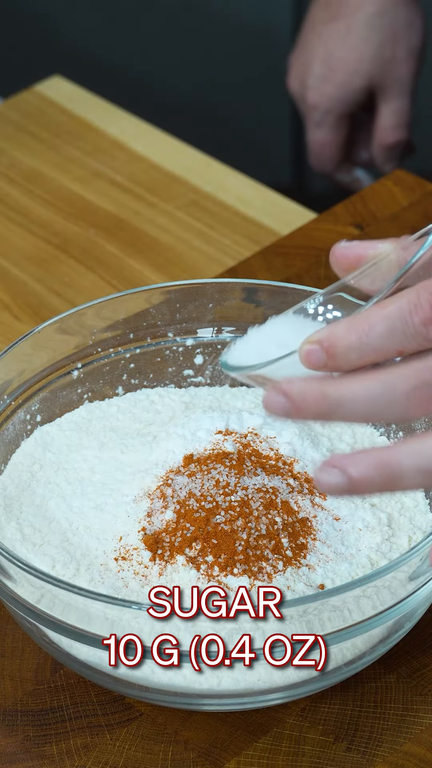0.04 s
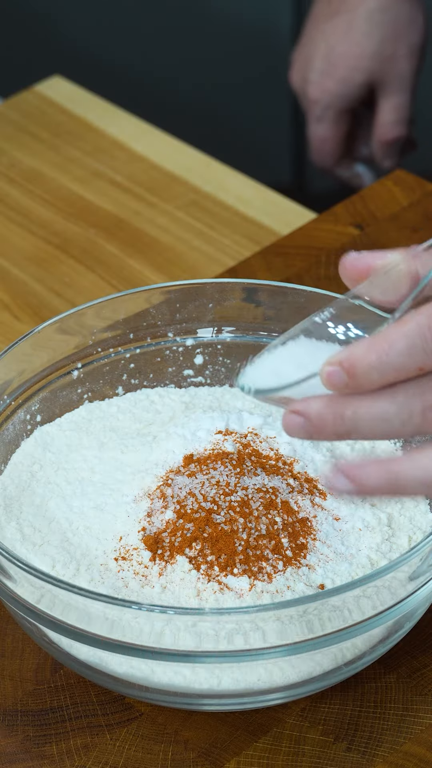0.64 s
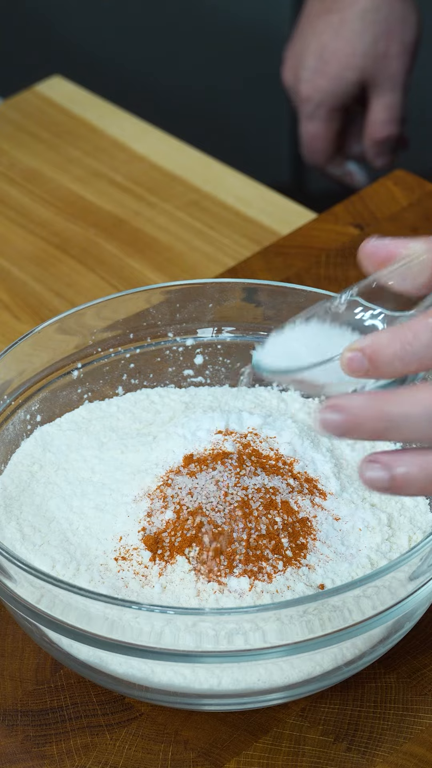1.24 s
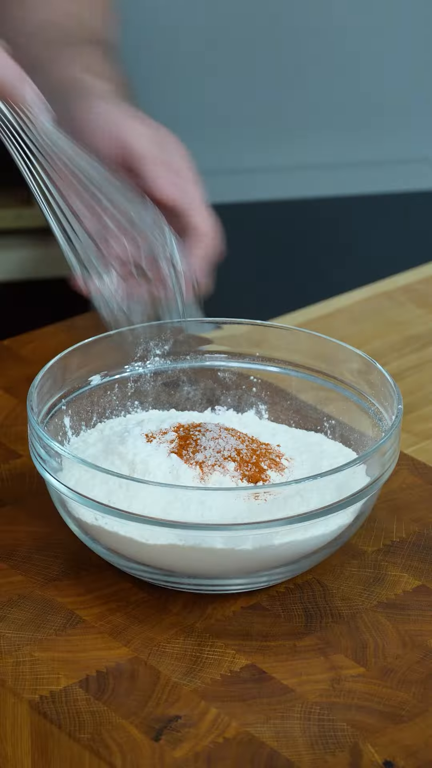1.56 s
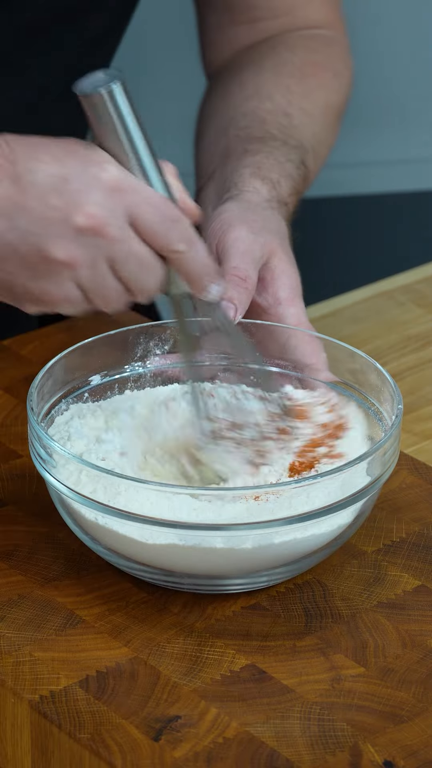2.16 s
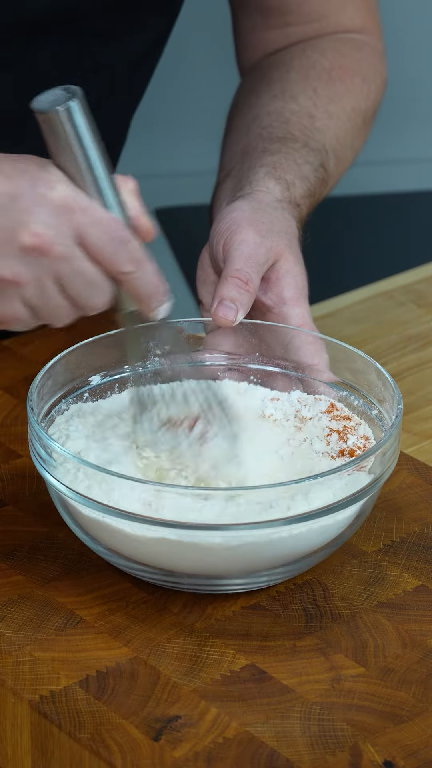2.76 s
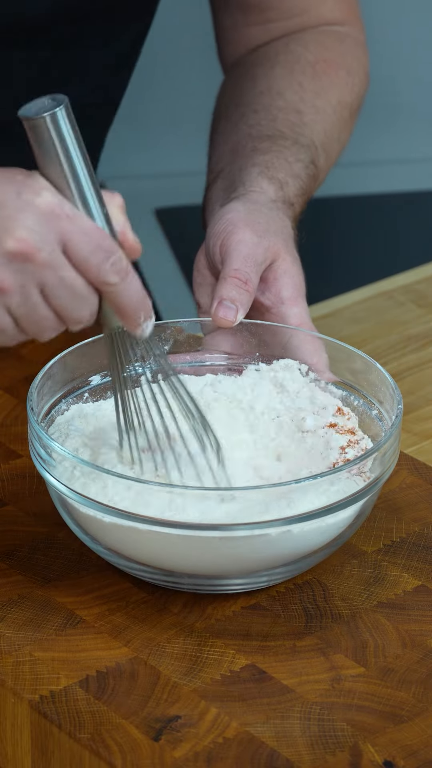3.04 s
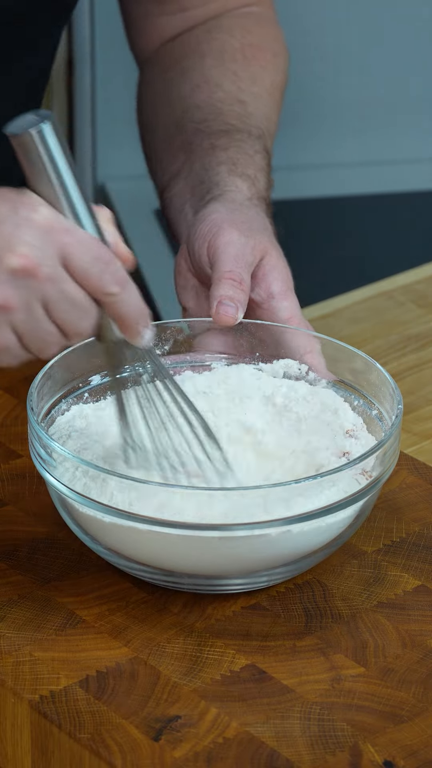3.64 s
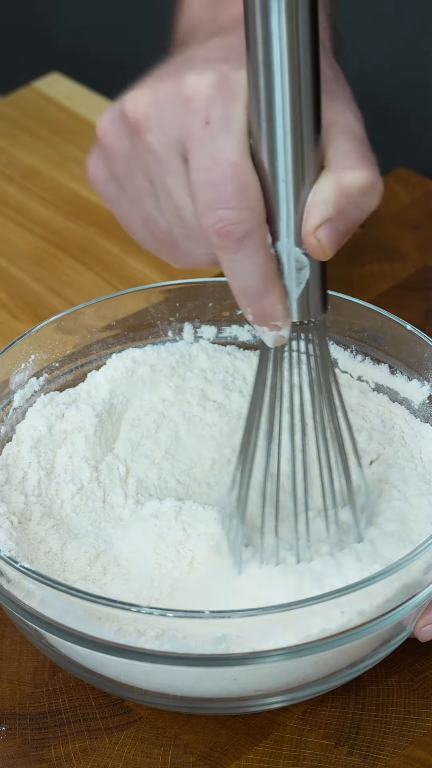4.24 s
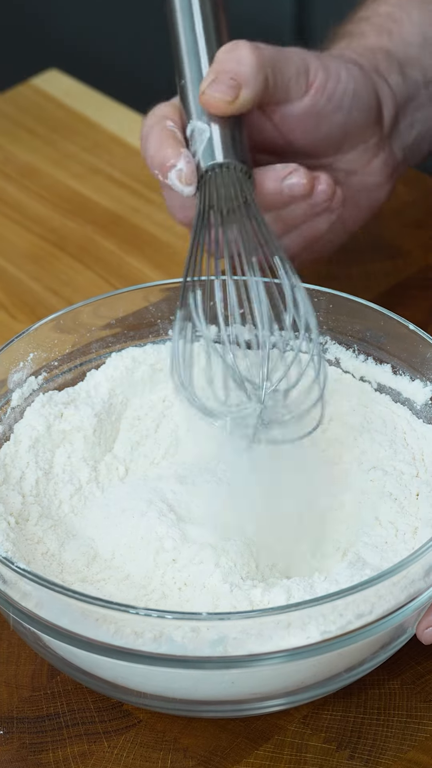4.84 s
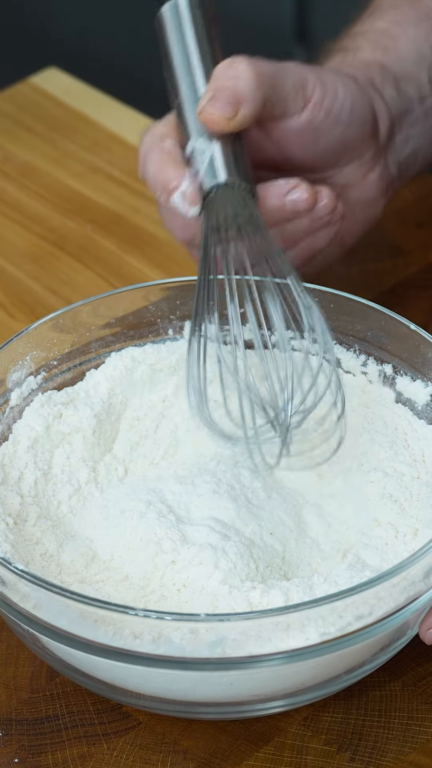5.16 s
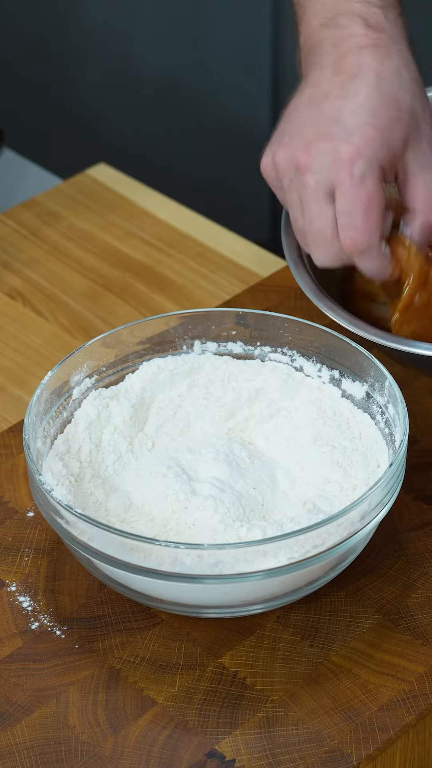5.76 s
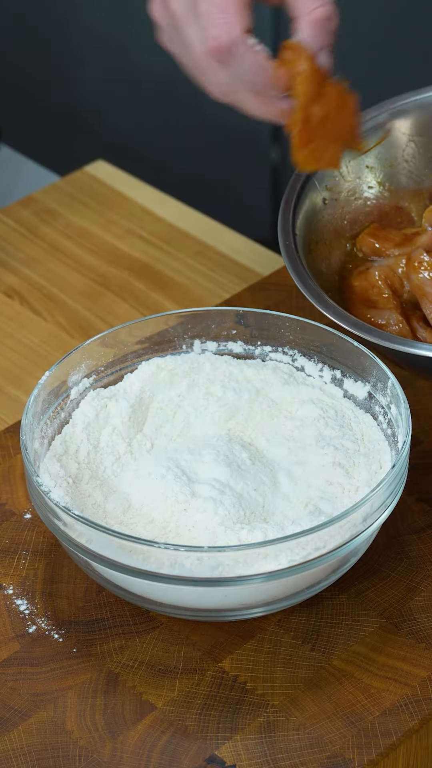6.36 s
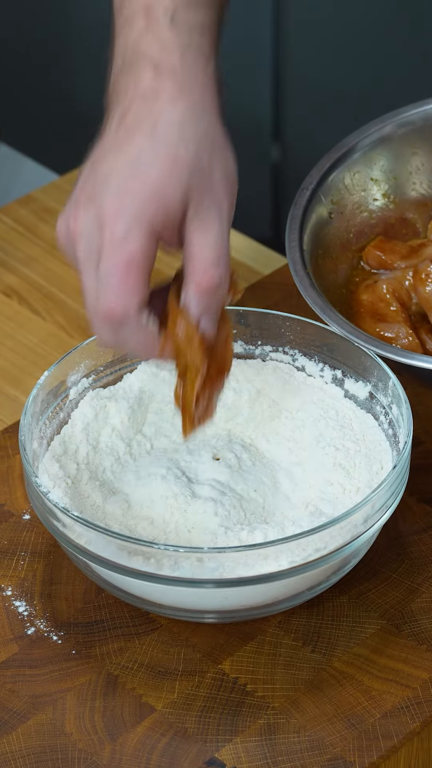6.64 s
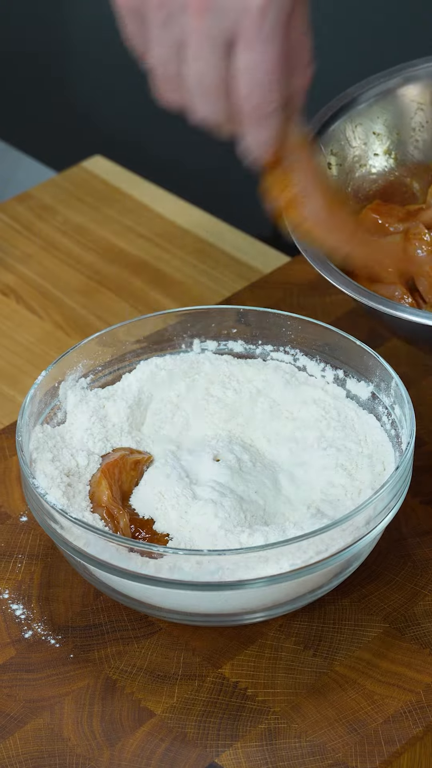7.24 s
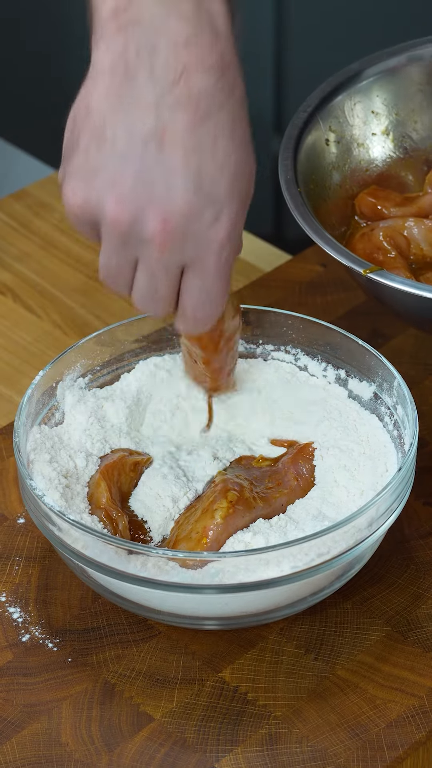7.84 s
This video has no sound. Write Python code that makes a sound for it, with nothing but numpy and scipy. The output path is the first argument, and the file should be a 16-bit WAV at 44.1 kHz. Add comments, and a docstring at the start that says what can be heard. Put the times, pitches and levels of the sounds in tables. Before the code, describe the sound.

A faint appliance hum fills a small, slightly reverberant kitchen throughout. From about 0.6 to 1.2 seconds, four very faint taps sound on a little glass dish. At 1.6 seconds sugar slides into a bowl of flour with a soft hiss that fades by 2.2. A wire whisk then rustles almost inaudibly through the flour until about 4.1 seconds, with tiny scrapes. Around 4.3 seconds the glass bowl bumps lightly on its wooden board. Between 4.8 and 5.4 seconds comes the loudest part, close by: the whisk is rapped four times quickly on the rim, each rap a bright, short glassy ring with jangling wires, while the rocking bowl knocks hollowly on the wood. The wires rattle once more around 5.6 seconds and the ringing stops. From 5.7 seconds to the end near 8, very faint wet touches and a small squelch follow as meat strips are laid in the flour.

```python
"""Sugar, flour and a whisk on glass

Sugar slides from a tapped glass dish into a glass bowl of flour, its countless impacts merging into a hiss.
A wire whisk stirs almost silently, then is rapped four times on the rim: the glass rings in its natural
modes, the wires jangle and the bowl knocks on its wooden board. Strips of wet meat are then laid in.
A small reverberant kitchen with a humming appliance surrounds it all."""
import sys
import numpy as np
from scipy import signal
from scipy.fft import rfft, irfft
from scipy.io import wavfile

SR = 44100
rng = np.random.default_rng(int(sys.argv[2]) if len(sys.argv) > 2 else 0)


def generate_wav(signal):
    """Clip the signal to [-1, 1] and save it as 16-bit WAV at the path in sys.argv[1]."""
    frames = np.transpose(np.atleast_2d(signal))
    scaled = np.clip(frames, -1, 1) * 32767
    pcm = np.round(scaled).astype(np.int16)
    wavfile.write(sys.argv[1], SR, pcm)


N = 352611
TIME = np.arange(N) / SR
AGE = TIME[:SR]   # the second that follows a blow
WIRE_SWING_S = .023   # the wire loops swing to and fro, so their contacts repeat at this period


def from_db(db):
    """Amplitude ratio of a level in decibels."""
    return 10 ** (np.asarray(db) / 20)


def rms_one(x):
    """Normalisation to unit rms."""
    return x / np.sqrt(np.mean(x ** 2) + 1e-20)


def at_hz(points, hz):
    """Interpolation of a spectrum on a logarithmic frequency axis."""
    frequencies, values = np.transpose(points)
    return np.interp(np.log(hz + 1e-9), np.log(frequencies), values)


def noise(gain_at, size):
    """Spectral shaping: white noise weighted by frequency, at unit rms."""
    hz = np.arange(size // 2 + 1) * SR / size + 1e-9
    return rms_one(irfft(rfft(rng.standard_normal(size)) * gain_at(hz), size))


def band_noise(centre_hz, octaves, size=SR):
    """Noise in a Gaussian band on a logarithmic frequency axis."""
    return noise(lambda hz: np.exp(-.5 * (np.log2(hz / centre_hz) / octaves) ** 2), size)


def drift(rate_hz, size=N):
    """Random fluctuation: low-pass noise at unit rms."""
    return noise(lambda hz: 1 / (1 + (hz / rate_hz) ** 2), size)


def cut(x, hz, kind, order=2):
    """Butterworth filter."""
    return signal.sosfilt(signal.butter(order, hz, kind, fs=SR, output="sos"), x)


def fade(t60):
    """Exponential decay: 60 dB in t60 seconds."""
    return 1000. ** (-AGE / t60)


def swell(rise_s, t60):
    """Linear attack, then exponential decay."""
    return np.minimum(AGE / rise_s, 1) * from_db(-60 * np.maximum(AGE - rise_s, 0) / t60)


def add(track, s, sound):
    """Superposition of a sound on the track at time s."""
    at = int(round(s * SR))
    track[at:at + len(sound)] += sound[:N - at]


def strike(modes, scatter_db, detune_hz, flutter=0):
    """Free vibration: damped modes vary with the contact point; a changing load flutters their pitch."""
    chance = rng.standard_normal((len(modes), 3))
    clock = AGE + flutter * np.cumsum(drift(rate_hz=45, size=SR)) / SR
    out = np.zeros(SR)
    for (hz, db, t60), (strength, shift, polarity) in zip(modes, chance):
        amplitude = from_db(db + scatter_db * strength) * np.sign(polarity)
        out += amplitude * fade(t60) * np.sin(2 * np.pi * (hz + detune_hz * shift) * clock)
    return out


def chatter(sound, per_s, t60, size):
    """Contact bounce: convolution with one impulse and its randomly timed, dying rebounds."""
    rebounds = (rng.random(SR) < per_s / SR) * rng.standard_normal(SR) * size * fade(t60)
    return signal.fftconvolve(sound, rebounds + signal.unit_impulse(SR))[:SR]


# early reflections from worktop and cupboards: (delay [s], gain [ratio])
REFLECTIONS = [(.0033, 0.38), (.0046, .45), (.0058, 0.38), (0.0114, .14), (.030, .16), (.042, 0.12)]
# diffuse tail of the kitchen: (frequency [Hz], t60 [s], relative level [dB])
REVERB_BANDS = [(100, 0.57, 7), (430, 0.44, -8), (900, 0.37, -1.5), (2500, 0.4, -1), (5960, .5, -7.5),
                (10000, 0.57, -9.5), (16000, .28, -19.5)]

def kitchen(x, tail_db):
    """Reverberation: direct sound, early reflections, then a diffuse tail that decays band by band."""
    hz = np.arange(SR // 2 + 1)
    white = rfft(rng.standard_normal(SR))
    response = np.zeros(SR)
    for centre, t60, db in REVERB_BANDS:
        share = at_hz([(row[0], row[0] == centre) for row in REVERB_BANDS], hz)
        decay = fade(t60) * np.clip((AGE - .004) / .012, 0, 1)
        response += from_db(db + tail_db) * irfft(white * share, SR) * decay / np.linalg.norm(decay)
    response[0] += 1
    for delay, gain in REFLECTIONS:
        add(response, delay, gain * cut(signal.unit_impulse(64), 3700, "low", order=1))
    return signal.fftconvolve(x, response)[:N]


# room air before its bass roll-off: (frequency [Hz], relative spectral density [dB])
AIR_SPECTRUM = [(15, -37.5), (25, -7), (55, 3), (74, -9.5), (108, -3), (127, -16), (161, -8.5),
                (249, -16.5), (285, -10), (451, -19), (734, -22), (911, -20), (1260, -28.5), (5430, -44.5),
                (16000, -54)]
# appliance hum: (frequency [Hz], rms level [dB], width [Hz])
HUM_TONES = [(49.7, -66, 0.54), (98, -72.5, 1.3), (164.6, -81.5, 30), (274, -81.5, 20), (452.4, -79, 4.7),
             (794, -85.5, 11), (890, -79, 8), (1110, -86.5, 140), (5420, -96.5, 250)]

def background(air_db=-68.77, roll_off_hz=130):
    """Ambient noise: broadband air plus appliance tones broadened by random frequency modulation."""
    air = noise(lambda hz: from_db(at_hz(AIR_SPECTRUM, hz)) * hz / np.hypot(hz, roll_off_hz), N)
    out = from_db(air_db) * air
    for hz, db, width in HUM_TONES:
        pitch_hz = hz + width / 2 * drift(width)
        out += from_db(db) * rms_one(np.sin(2 * np.pi * np.cumsum(pitch_hz) / SR))
    return out


# resonances of the wires in flour: (frequency [Hz], half width [Hz], relative level [dB])
RUSTLE_PEAKS = [(5370, 570, -4.5), (6450, 160, -7), (8600, 270, 0), (11900, 220, -20)]
# wires catching on the bowl under the flour: (time [s], level [dB])
WIRE_CATCHES = [(2.53, -87), (2.67, -89), (3.762, -75), (3.935, -88), (4.109, -82.5)]

def stirring(start_s=2.3, end_s=4.08, ramp_s=.25, level_db=-91.5, strokes_per_s=8):
    """Frictional excitation: uneven strokes in flour keep the wires singing; some catch on the bowl."""
    moving = np.clip(np.minimum(TIME - start_s, end_s - TIME) / ramp_s, 0, 1)
    singing = noise(lambda hz: sum(from_db(db) / np.hypot(1, (hz - centre) / width) ** 2
                                   for centre, width, db in RUSTLE_PEAKS), N)
    pressure_db = 2 * np.sin(2 * np.pi * strokes_per_s * TIME) + 2.5 * drift(rate_hz=25)
    catching = np.zeros(N)
    for s, db in WIRE_CATCHES:
        add(catching, s, from_db(db) * swell(rise_s=.003, t60=.11))
    scrape = catching * from_db(-3) * band_noise(4100, octaves=1, size=N)
    return (moving * from_db(level_db + pressure_db) + catching) * singing + scrape


def squelch(start_s=7.5, length_s=.17, start_hz=2200, rise_hz_per_s=3300, level_db=-78):
    """Amplitude modulation: noise roughens a tone that rises as the wet meat peels away."""
    age = np.clip(TIME - start_s, 0, length_s)
    pitch_hz = start_hz + rise_hz_per_s * age
    envelope = from_db(level_db) * np.sin(np.pi * age / length_s)
    return envelope * drift(rate_hz=180) * np.sin(2 * np.pi * np.cumsum(pitch_hz) / SR)


# touches of fingers and wet meat: (time [s], level [dB], centre [Hz], width [octaves], t60 [s])
SOFT_TOUCHES = [(4.665, -46.5, 1628, 0.75, 0.0057), (5.718, -70, 4130, 0.33, .025),
                (6.436, -69.5, 1700, 0.68, .039), (6.779, -66, 2670, 0.35, 0.055),
                (7.408, -76.5, 4500, .9, .02)]
# shifting flour and meat: (time [s], level [dB], centre [Hz], width [octaves], t60 [s])
SOFT_SWISHES = [(3.01, -75.5, 4170, 0.71, .28), (3.93, -66.5, 350, 1, 0.19), (7.65, -89, 8500, 0.38, .4),
                (7.66, -85, 3300, .35, 0.82)]

def touches(touch_rise_s=.0084, swish_rise_s=.032):
    """Damped contact: soft matter gives bursts of band noise, brief for a touch, slower for a swish."""
    out = np.zeros(N)
    for events, rise_s in (SOFT_TOUCHES, touch_rise_s), (SOFT_SWISHES, swish_rise_s):
        for s, db, hz, octaves, t60 in events:
            add(out, s, from_db(db) * band_noise(hz, octaves) * swell(rise_s, t60))
    return out


# taps that loosen the sugar: (time [s], level [dB])
LOOSENING_TAPS = [(.649, -81), (0.808, -72.5), (0.976, -79), (1.148, -80)]
# small glass dish: (frequency [Hz], relative level [dB], t60 [s])
DISH_MODES = [(4210, 1, 0.073), (4520, -6, .07), (5500, -8, 0.07), (8040, -7, 0.052), (12600, -2, .05)]

def dish_taps():
    """Impulse excitation: each tap shifts the crystals and sets the small dish ringing briefly."""
    out = np.zeros(N)
    for s, db in LOOSENING_TAPS:
        crystals = band_noise(4000, octaves=.79) * swell(rise_s=.00079, t60=.089)
        ring = strike(DISH_MODES, scatter_db=.5, detune_hz=30)
        add(out, s, from_db(db - 2) * (crystals + ring))
    return out


# envelope of the sliding sugar: (time [s], lower band level [dB], upper band level [dB])
POUR_LEVELS = [(1.582, -64.5, -72), (1.598, -57, -67.5), (1.688, -58, -66), (1.722, -56, -61),
               (1.87, -54, -67), (2.024, -67.5, -80), (2.152, -86, -100), (2.25, -91, -100)]
# sugar hiss: (frequency [Hz], relative spectral density [dB])
SUGAR_SPECTRUM = [(500, -13.5), (1000, -12.5), (1500, -9.5), (2100, -4.5), (2800, -6), (3450, -1),
                  (4100, -5), (5400, -1.5), (6500, -5), (7500, -8), (8600, -8), (11000, -12.5),
                  (14700, -20), (15800, -22)]

def sugar(split_hz=7000, grain_db=1.5, bowl_ring_db=-73, peak_s=1.97, rise_db_per_s=26, fall_db_per_s=80):
    """Incoherent summation: crystals skidding on glass merge into a hiss; the bowl they fall into resonates."""
    times, *levels = np.transpose(POUR_LEVELS)
    body_db, top_db = (np.interp(TIME, times, db) for db in levels)
    grains = rng.standard_normal(N) * from_db(grain_db * rng.standard_normal(N))
    hz = np.arange(N // 2 + 1) * SR / N
    hiss = rfft(grains) * from_db(at_hz(SUGAR_SPECTRUM, hz))
    low_share = 1 / (1 + (hz / split_hz) ** 12)
    body, top = (rms_one(irfft(hiss * share, N)) for share in (low_share, 1 - low_share))
    swell_db = np.minimum(rise_db_per_s * (TIME - peak_s), fall_db_per_s * (peak_s - TIME))
    bowl_ring = from_db(bowl_ring_db + swell_db) * band_noise(3400, octaves=.1, size=N)
    flowing = np.interp(TIME, [1.572, 1.574, 2.17, 2.25], [0, 1, 1, 0])
    return flowing * (from_db(body_db - .6) * body + from_db(top_db - .9) * top + bowl_ring)


# bowl and board together: (frequency [Hz], relative level [dB], t60 [s])
BOARD_MODES = [(279.4, -18, 0.029), (492, -12, 0.057), (564, -3.5, .04), (696, -4.5, 0.018),
               (774, -9, 0.068), (923, -12, 0.025), (1030, -10.5, 0.015), (1292, -2.5, 0.029),
               (1700, -18, 0.0061)]

def knock(edge_hz, detune=.016, crack_db=-13):
    """Compliant impact: bowl and board ring together, and the yielding wood absorbs most treble."""
    board = np.zeros(SR)
    for hz, db, t60 in BOARD_MODES:
        amplitude = from_db(db + rng.standard_normal())
        pitch_hz = hz * (1 + detune * rng.standard_normal())
        board += amplitude * fade(t60) * np.cos(2 * np.pi * pitch_hz * AGE)
    hollow = cut(board, edge_hz, "low", order=10)
    crack = from_db(crack_db) * cut(board, 1500, "low", order=3)
    return cut(hollow + crack, 170, "high")


# bowl landing on the board or pressed onto it: (time [s], knock level [dB], worktop thud level [dB])
LANDINGS = [(3.757, -53.5, -56.5), (4.263, -46, -48), (4.272, -40.5, -43.5), (4.3064, -28, -38.5),
            (4.803, -25, -50), (4.9751, -16.5, -45), (5.1653, -18, -49), (5.1783, -12.5, -41.5),
            (5.3361, -17.5, -49)]

def knocks(tip_delay_s=.005, tip_db=7):
    """Rocking: each rap tips the bowl with a dull knock; then it swings back and lands harder."""
    out = np.zeros(N)
    for s, low_db, *_ in GLASS_RAPS:
        add(out, s + tip_delay_s, from_db(low_db + tip_db) * knock(edge_hz=830))
    for s, db, _ in LANDINGS:
        add(out, s, from_db(db) * knock(edge_hz=1010))
    return out


def worktop(thud_hz=78):
    """Structure-borne sound: the worktop radiates a soft low thud under each landing."""
    out = np.zeros(N)
    envelope = fade(t60=.2) * (1 - fade(t60=.014))
    for s, _, db in LANDINGS:
        add(out, s, from_db(db) * band_noise(thud_hz, octaves=1.2) * envelope)
    return out


# dense small modes of the wire cage: (frequency [Hz], relative spectral density [dB])
CAGE_SPECTRUM = [(300, -22), (1000, -12.5), (2000, -2), (3000, -6), (4600, -1), (6000, -0.5), (7600, -8),
                 (8600, 6), (9800, -8.5), (10800, -4), (11500, -13), (12300, -3), (14500, -2), (16000, -14)]

def clash(t60):
    """Modal overlap: the many modes of the wire cage blend into decaying noise."""
    return noise(lambda hz: from_db(at_hz(CAGE_SPECTRUM, hz)), SR) * fade(t60)


# wire loops: (frequency [Hz], relative level [dB], t60 [s])
WIRE_MODES = [(2520, -18, 0.25), (3890, -10, 0.06), (4260, -11.5, 0.11), (5310, -12, .2), (5555, -1, .19),
              (5550, -1.5, 0.13), (6500, -12.5, .13), (8600, -10, 0.11), (8400, -7.5, 0.11),
              (8840, -11.5, .15), (9100, -17, .12), (11900, -16.5, .09), (12840, -12, 0.15),
              (14300, -13.5, .08), (14720, -9, .08)]

def wire_ring(count=3):
    """Beating: loops of nearly equal length ring at slightly different frequencies."""
    loops = [strike(WIRE_MODES, scatter_db=4.5, detune_hz=28.1, flutter=.0033) for _ in range(count)]
    return sum(loops) / np.sqrt(count)


# free wires jangling: (time [s], level [dB], contacts [count], upper edge [Hz])
WIRE_JANGLES = [(5.103, -47, 2, 14400), (5.392, -44, 3, 13100), (5.583, -49.5, 2, 7500)]

def jangles(step_db=-1, dulling=.7):
    """Rattling: loose wires collide once per swing, each contact softer and duller than the last."""
    out = np.zeros(N)
    for s, db, contacts, edge_hz in WIRE_JANGLES:
        for k in range(round(contacts)):
            wires = from_db(.5) * wire_ring() + from_db(-1) * clash(t60=.061)
            tick = cut(wires, edge_hz * dulling ** k, "low")
            buzz = chatter(tick, per_s=160, t60=.18, size=.25)
            add(out, s + k * WIRE_SWING_S, from_db(db + k * step_db) * buzz)
    return out


# glass bowl: (frequency [Hz], relative level [dB], t60 before damping by the wires [s])
BOWL_MODES = [(1343, -9, .2), (2372, -1.5, 0.15), (2300, -13, 0.16), (3653, -2, 0.32), (3560, -8.5, 0.12),
              (4600, -19.5, 0.12), (5086, 2.5, 0.17), (5340, -14.5, 0.16), (6557, 3.5, 0.039),
              (6610, -1, 0.071), (8510, 1.5, 0.05), (9290, -19.5, 0.063), (10290, -20, .12),
              (10840, -12, 0.068), (12400, -10.5, 0.1), (13650, -14, .05), (14480, -11, .05)]
# whisk on the glass, a faint touch on the bottom through the flour and four raps on the rim: (time [s], ring at
# 2 kHz [dB], at 4.5 kHz [dB], at 9 kHz [dB], wire level [dB], t60 share left by wires resting on the glass
# [ratio], first rebound [dB])
GLASS_RAPS = [(4.266, -76, -63, -54.5, -58.5, 0.32, -26), (4.776, -31.5, -43, -29.5, -37, .85, -3.5),
              (4.951, -28.5, -34.5, -27, -37, 0.78, -8), (5.145, -35.5, -35.5, -30, -37.5, 0.8, -27),
              (5.312, -31.5, -35, -30.5, -37, 0.51, -3)]

def raps(contacts=3, treble_step_db=-3):
    """Impact excitation: the whisk hits the glass and rebounds once per swing, ringing glass and wires."""
    out = np.zeros(N)
    onset = 1 - fade(t60=.011)   # springy wires load the glass gradually
    for s, low_db, mid_db, high_db, wire_db, t60_share, rebound_db in GLASS_RAPS:
        for k in range(contacts):
            excitation = [(2000, low_db), (4500, mid_db), (9000, high_db + k * treble_step_db)]
            modes = [(hz, db + at_hz(excitation, hz), t60 * t60_share) for hz, db, t60 in BOWL_MODES]
            glass = .8 * strike(modes, scatter_db=3, detune_hz=9, flutter=.0055)
            # a bowl is never quite round: each mode has a weaker twin that beats with it
            twins = .4 * strike(modes, scatter_db=0, detune_hz=28)
            wires = from_db(2) * clash(t60=.089) + from_db(-12) * wire_ring()
            blow = (glass + twins + from_db(wire_db) * wires) * onset
            rap = chatter(blow, per_s=510, t60=.16, size=.14)
            add(out, s + k * WIRE_SWING_S, from_db(rebound_db * k ** 1.1) * rap)
    return out


def scene(ring_stop_s=5.695):
    """Superposition: blows and handling reverberate, the rest is direct; the last ringing stops short."""
    bowl = kitchen(raps() + jangles(), tail_db=0) + kitchen(knocks(), tail_db=-.5)
    ringing = bowl * np.clip((ring_stop_s - TIME) / .0019, 0, 1)
    handling = kitchen(dish_taps() + touches() + squelch(), tail_db=-.5)
    return (ringing + handling + worktop() + sugar() + stirring() + background())[None]


def record(dry):
    """Band limiting: a steep zero-phase low-pass at 15.8 kHz."""
    return signal.sosfiltfilt(signal.ellip(10, .05, 60, 15800, fs=SR, output="sos"), dry)


dry = scene()
out = record(dry)
generate_wav(out)
```